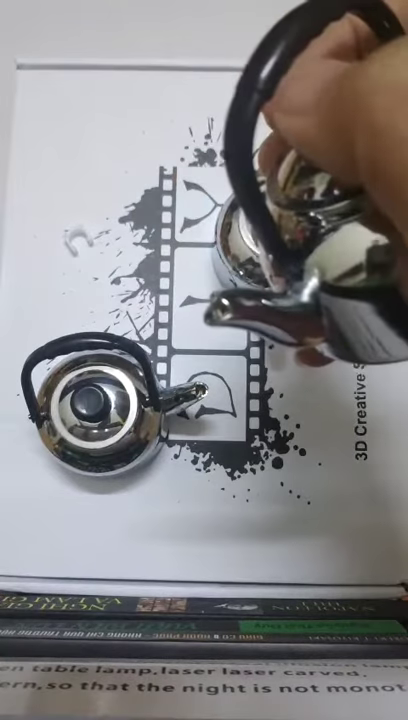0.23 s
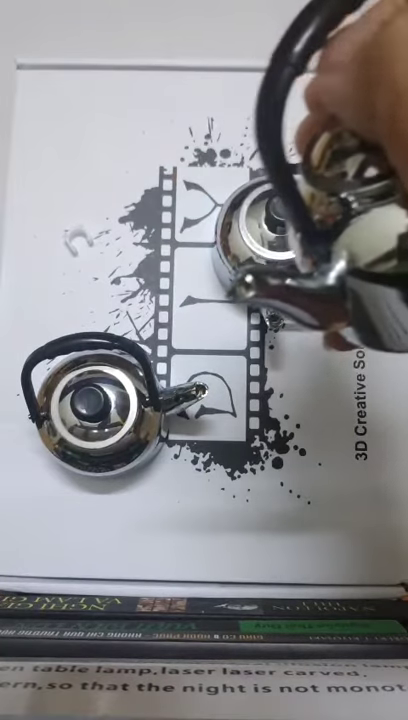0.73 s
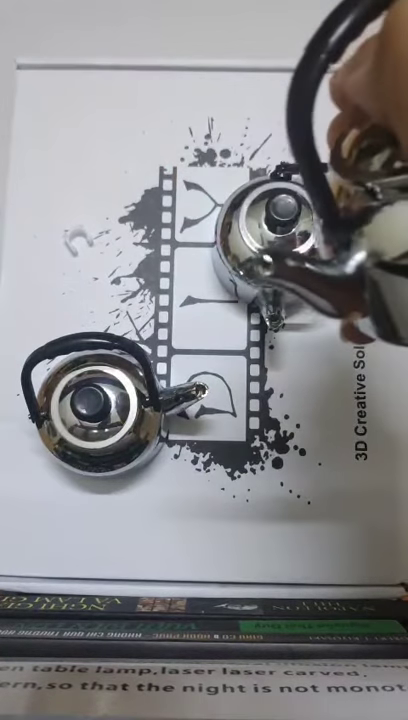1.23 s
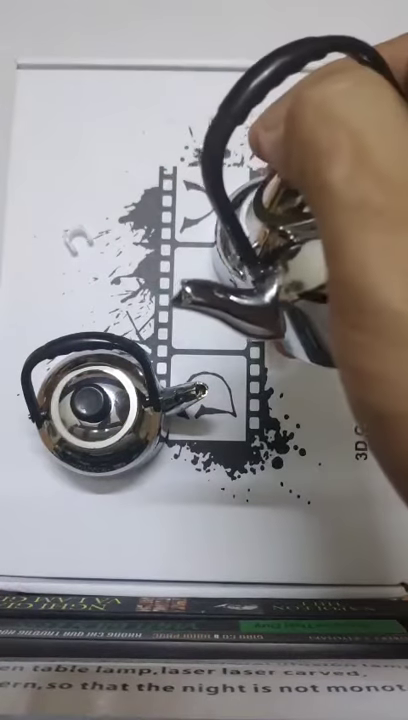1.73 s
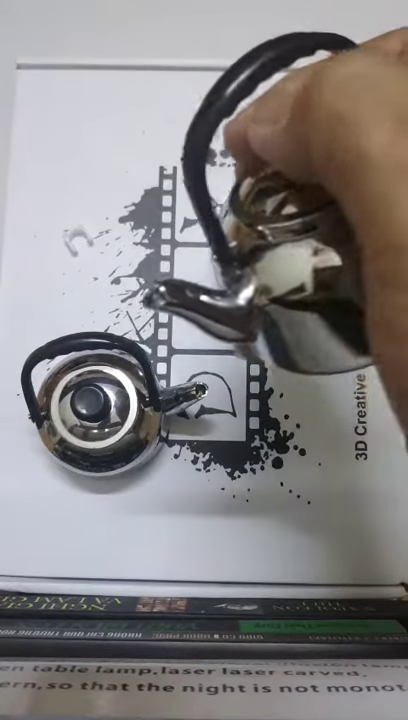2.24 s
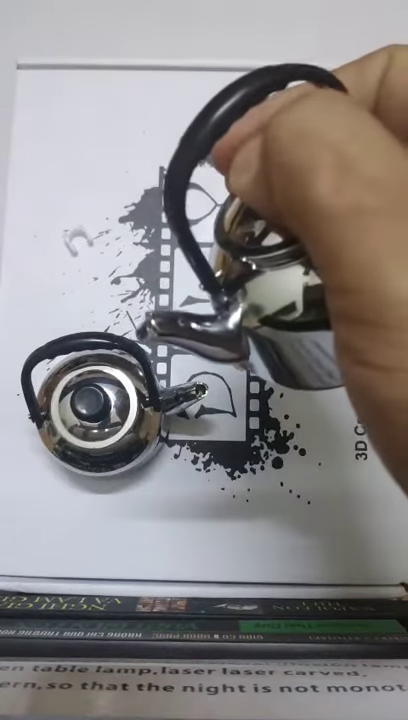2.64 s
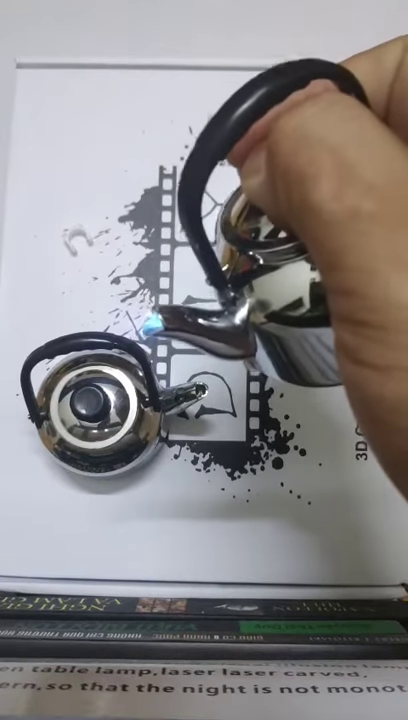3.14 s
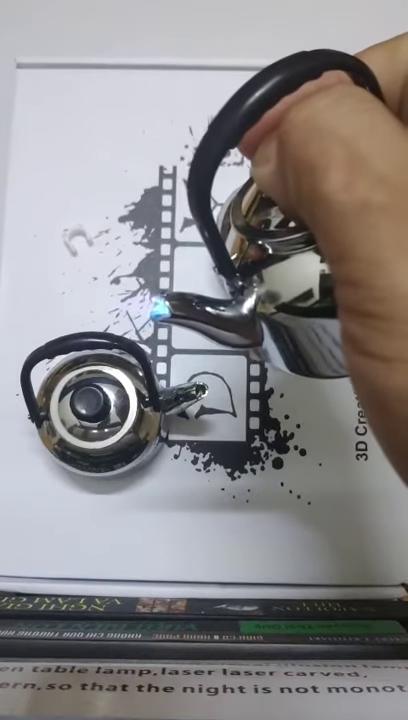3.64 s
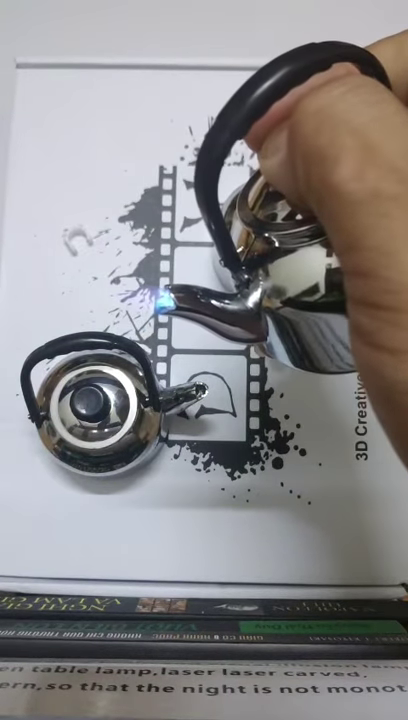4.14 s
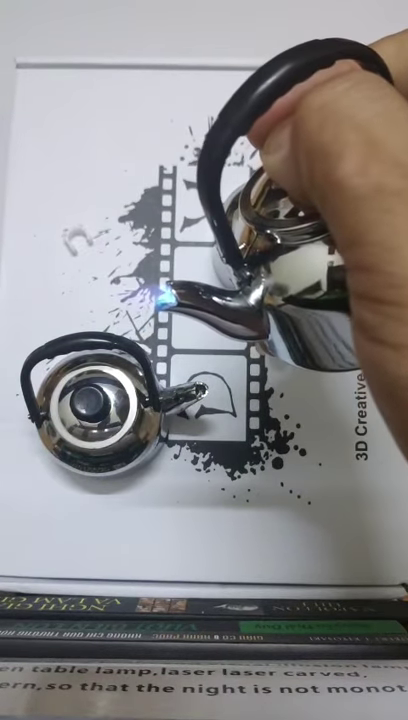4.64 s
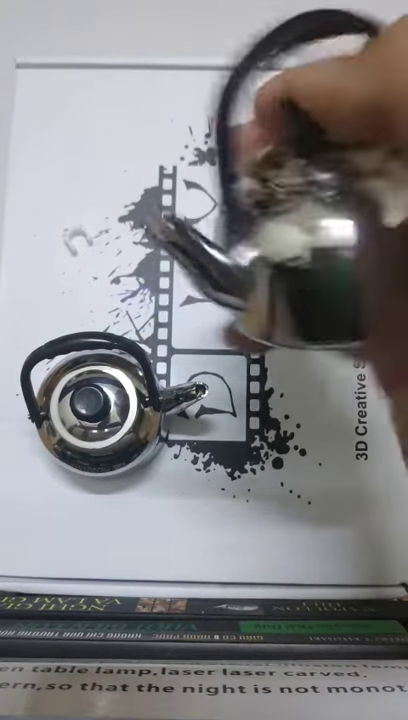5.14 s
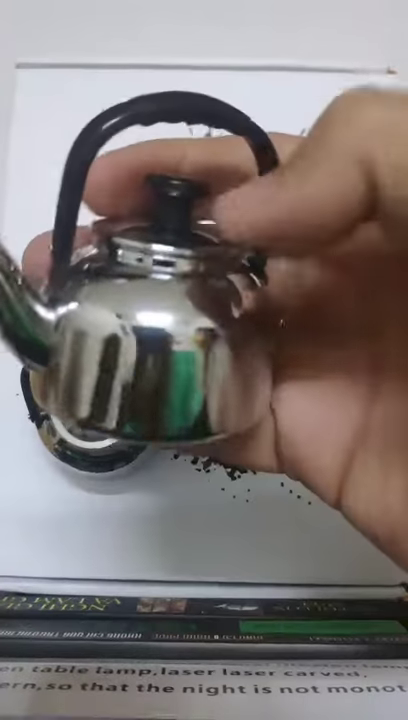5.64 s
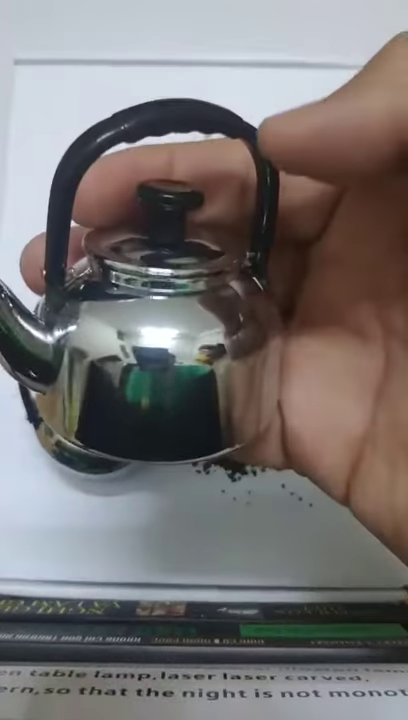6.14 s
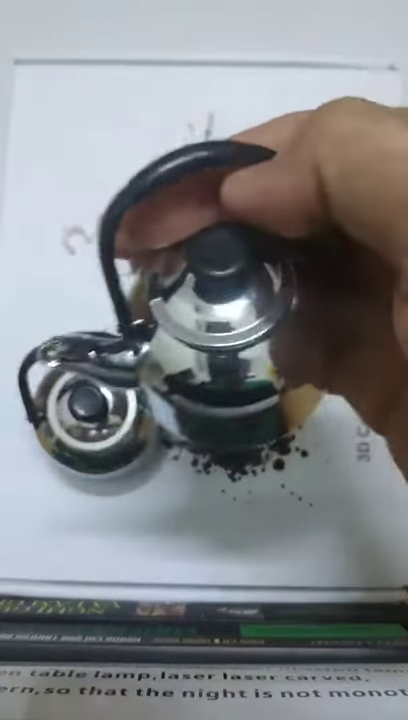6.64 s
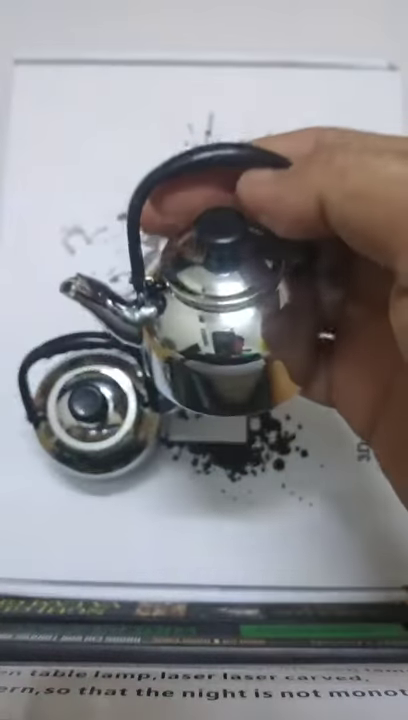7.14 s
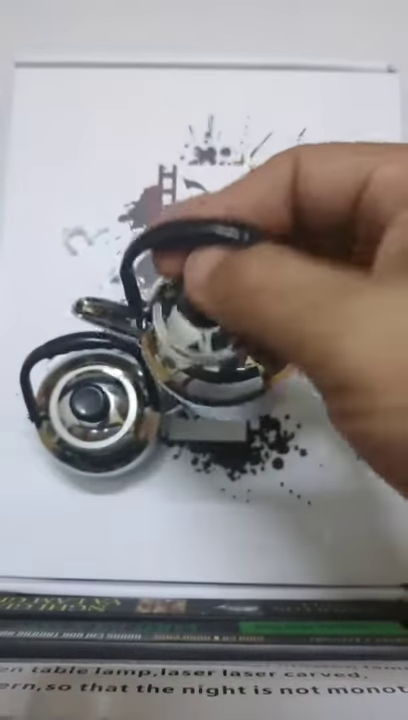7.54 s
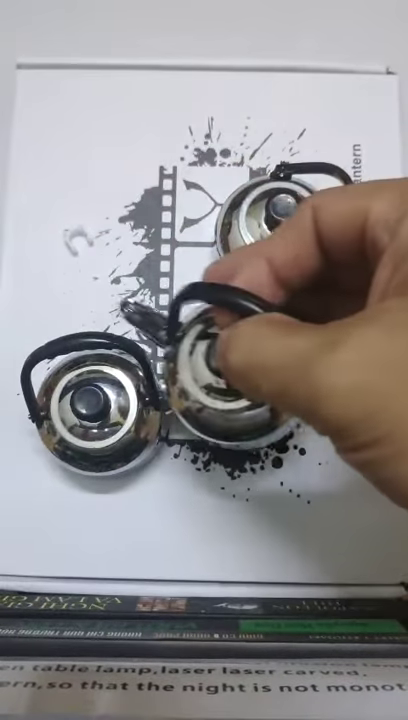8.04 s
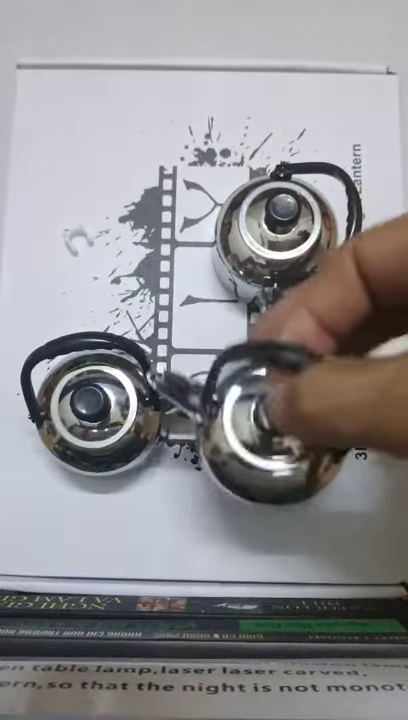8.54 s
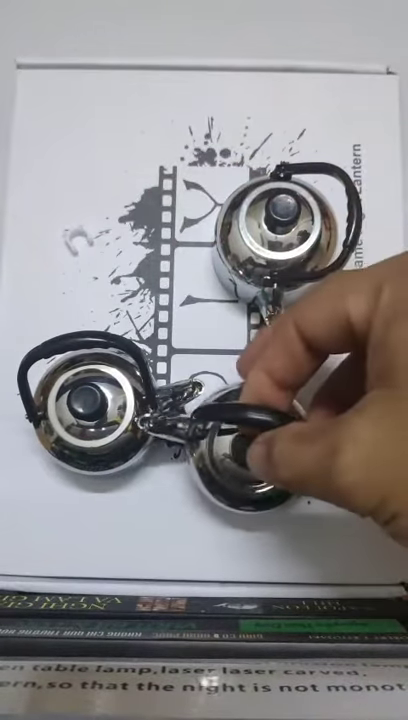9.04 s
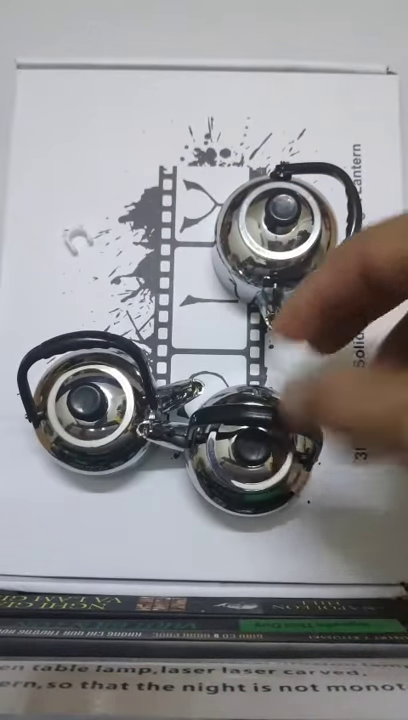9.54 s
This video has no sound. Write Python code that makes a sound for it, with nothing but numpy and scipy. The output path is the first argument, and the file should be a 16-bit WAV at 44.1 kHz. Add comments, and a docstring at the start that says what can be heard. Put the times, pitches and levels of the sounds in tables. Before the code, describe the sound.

In a room with a constantly rushing, faintly whining fan, a small teapot-shaped metal lighter leaks a thin hiss, then snaps sharply and flares into a steady fluttering jet. It burns about two seconds and clicks off. Later its foot clinks and knocks on the paper-covered table. The close stereo microphone catches lumpy low wind puffs, almost entirely on the left.

```python
"""Gas lighter beside a fan.

A small metal gas lighter is lit, let go and set down on a paper-covered table, close to a phone with two ports.
Noise shaped by the nozzle, spout and jet makes the gas hiss, flare up and burn; a hand's rub rustles low.
Dying sines and noise bursts make the igniter's snaps, the foot's clinks and the table's thuds.
Noise bands make a fan's rush, drone and whine; rumble and short swirls puff its draught at the left port."""
import sys
import numpy as np
from scipy.fft import rfft, irfft, next_fast_len
from scipy.io import wavfile
from scipy.ndimage import uniform_filter1d, minimum_filter1d, map_coordinates

SR = 44100
rng = np.random.default_rng(int(sys.argv[2]) if len(sys.argv) > 2 else 0)


def int16_out(signal):
    """Quantize to a 16-bit WAV file."""
    q = np.round(np.clip(np.atleast_2d(signal).T, -1, 1) * 32767)
    wavfile.write(sys.argv[1], SR, q.astype(np.int16))


N = 431738


def amp(db):
    """Amplitude factor from dB."""
    return 10 ** (np.asarray(db) / 20)


def unit(x):
    """Scale to rms 1."""
    return x / np.sqrt(np.mean(x ** 2) + 1e-20)


def along(points, hz):
    """Interpolate (Hz, value) points on a log frequency axis."""
    point_hz, value = np.transpose(points)
    return np.interp(np.log(hz + 1), np.log(point_hz + 1), value)


def curve(rows):
    """Gain per sample from (s, dB) rows."""
    return amp(np.interp(np.arange(N) / SR, *np.transpose(rows)))


def wobble(knots_per_s):
    """Smooth random curve through normal knots."""
    knots = rng.standard_normal(int(N * knots_per_s / SR) + 4)
    return map_coordinates(knots, [np.arange(N) * knots_per_s / SR])


def swell(start_s, rise_s, end_s, db, fall_db_per_s):
    """Gain per sample: a smooth rise, a hold until the end, then a steady fall in dB."""
    t = np.arange(N) / SR
    rise = np.sin(np.pi / 2 * np.clip((t - start_s) / rise_s, 0, 1)) ** 2
    return rise * amp(db - fall_db_per_s * np.maximum(t - end_s, 0))


def filtered(x, response):
    """Multiply the spectrum of x by a response of frequency."""
    size = next_fast_len(x.shape[-1] + 8192)
    spectrum = rfft(x, size) * response(np.fft.rfftfreq(size, 1 / SR))
    return irfft(spectrum, size)[..., :x.shape[-1]]


def rush(gain, alike, count=N):
    """Stereo noise, 3 dB over its gain at each port; the table sets the left-right correlation."""
    def mid_side(hz):
        turn = np.arccos(np.clip(along(alike, hz), -1, 1)) / 2
        return gain(hz) * [np.cos(turn), np.sin(turn)]
    mid, side = filtered(rng.standard_normal((2, count)), mid_side)
    return np.sqrt(2) * np.array([mid + side, mid - side])


def passing(start_s, gain, alike):
    """Rush of rms 1 that lasts three seconds."""
    out = np.zeros((2, N))
    add(out, start_s, unit(rush(gain, alike, count=3 * SR)))
    return out


def humps(rows, hz):
    """Gain of bell-shaped resonances (Hz, width Hz, dB rms) on white noise; powers add."""
    return np.sqrt(sum(amp(2 * db) * SR / (2 * width_hz) * np.exp(-np.pi * ((hz - centre_hz) / width_hz) ** 2)
                       for centre_hz, width_hz, db in rows))


def ring(modes, tilt_db, scatter_db, centre_hz):
    """One blow: modes share random strengths between ports, with a new phase at each."""
    t = np.arange(SR // 8) / SR
    scatter = rng.normal(0, scatter_db, len(modes))
    out = np.zeros((2, len(t)))
    for port in range(2):
        for (hz, db, t60_s), extra_db in zip(modes, scatter):
            level_db = db + extra_db + tilt_db * np.log2(hz / centre_hz)
            phase_turns = rng.uniform(0, 0.37)
            out[port] += amp(level_db - 60 * t / t60_s) * np.sin(2 * np.pi * (hz * t + phase_turns))
    return out * (1 - np.exp(-t / 0.00019))


def burst(lo_hz, hi_hz, t60_s):
    """Dying puff of band noise, partly shared by the ports."""
    t = np.arange(SR // 8) / SR
    noise = rng.standard_normal((2, len(t))) + rng.standard_normal(len(t))
    band = filtered(noise, lambda hz: 1 / (1 + (lo_hz / (hz + 1)) ** 6 + (hz / hi_hz) ** 6))
    return unit(band) * amp(-60 * t / t60_s) * (1 - np.exp(-t / 0.00018))


def add(track, s, sound):
    """Mix a sound in at a time in seconds."""
    track[..., round(s * SR):][..., :sound.shape[-1]] += sound


# Spectrum shape of the fan's rush. Each row: frequency in Hz, relative density in dB per Hz.
FAN_RUSH = [(25, -1.5), (100, -9), (200, -9.5), (310, -15), (420, -25.5), (950, -19), (1700, -19),
            (3500, -18), (4300, -19), (6500, -15), (8000, -7.5), (9300, -12.5), (10200, -21), (13000, -28),
            (16000, -32)]
# Broad fan resonances. Each row: centre in Hz, width in Hz, level in dB before rush() adds 3 dB.
FAN_DRONE = [(50.3, 7.5, -56.5), (122, 12, -63), (186.7, 25, -61), (581, 270, -65.5), (778, 119, -61),
             (1440, 220, -62.5), (1990, 320, -61.5), (2423, 265, -58.5), (2855, 390, -59.5),
             (4850, 370, -60.5), (5870, 850, -57.5), (7040, 270, -61), (8730, 270, -57.5)]
# Thin fan tones. Each row: centre in Hz, level in dB before rush() adds 3 dB.
FAN_WHINE = [(699.8, -65.5), (722, -67.5), (753.7, -63), (796.7, -73.5), (819.5, -64.5), (1130, -68.5),
             (1254, -64.5), (1480, -66), (1507, -63.5), (1890, -64.5), (2008, -67), (2223, -66),
             (2390, -65), (2514, -71.5), (2643, -63.5), (2891, -65), (3273, -76), (3332, -67),
             (3575, -71.5), (3898, -67), (4560, -73), (4802, -66), (4850, -62.5), (5432, -62), (5658, -62)]
# Likeness of the two ports. Each row: frequency in Hz, left-right correlation from -1 to 1.
PORT_LIKENESS = [(60, 0.93), (180, 1), (550, 0.65), (1650, 0.15), (4970, -0.042), (15000, 0.031)]
FAN_RUSH_DB = -43.5  # before rush() adds 3 dB


def fan():
    """Broad rush, boomy resonances and many thin, unsteady tones, the high ones more smeared."""
    tones = [(hz, 3 + 0.0035 * hz, db) for hz, db in FAN_WHINE]

    def gain(hz):
        broad = amp(FAN_RUSH_DB) * unit(amp(along(FAN_RUSH, hz)))
        return np.hypot(broad, humps(FAN_DRONE + tones, hz))
    return amp(0.48 * wobble(2.98)) * rush(gain, PORT_LIKENESS)


# Air moving over the left port. Each row: time in seconds, rumble level in dB.
DRAUGHT_LEVEL = [(0.0, -39), (0.35, -66), (1.0, -62), (2.2, -51), (2.6, -69), (3.3, -43), (3.55, -44),
                 (4.2, -48), (4.95, -46), (5.45, -62), (6.13, -45), (6.8, -61), (7.25, -45), (7.66, -50),
                 (8.0, -45), (9.2, -60), (9.6, -52), (9.79, -52)]
# Strong eddies on the left port. Each row: centre in seconds, swirl peak in dB, mid-swirl frequency in Hz.
EDDIES = [(0.39, -28, 59), (1.13, -18.5, 78), (1.163, -28, 47.7), (2.212, -28.5, 49), (2.395, -27, 37.6),
          (2.908, -31, 56), (2.956, -26, 35.8), (3.242, -26.5, 50.7), (3.394, -26, 55), (3.576, -28, 27),
          (3.695, -32, 42), (3.907, -28.5, 65), (3.961, -30, 48), (4.006, -34, 31), (4.448, -28.5, 48.3),
          (4.48, -29, 38), (4.537, -18.5, 84), (4.594, -32, 37), (4.738, -32, 39), (4.821, -21.5, 62.3),
          (4.96, -19, 41), (5.042, -32, 33), (5.307, -28, 33), (5.665, -29.5, 34.2), (5.694, -26, 43),
          (5.727, -22, 83), (6.208, -16.5, 39.6), (6.393, -28, 50), (6.465, -30, 103), (7.024, -29.5, 42),
          (7.17, -30.5, 61), (7.413, -28, 59), (7.481, -30, 43), (7.808, -28, 52), (7.85, -30.5, 42.8),
          (8.402, -27.5, 40.8), (8.476, -23.5, 42), (8.779, -22.5, 76), (8.814, -27.5, 37), (9.61, -35, 40)]
# Rumble around an eddy: level relative to its peak, exponential time constants before and after.
WAKE_DB, WAKE_LEAD_S, WAKE_TRAIL_S = -15.5, 0.035, 0.047


def draught():
    """Lumpy rumble swells around strong eddies, each a brief push and pull, nearly all at the left port."""
    rumble = filtered(rng.standard_normal(N), lambda hz: hz / (hz + 8) / (1 + (hz / 45) ** 2.0))
    knot_s = np.arange(0, N / SR, .005)
    wake = sum(amp(db + WAKE_DB) * np.exp(np.minimum((knot_s - s) / WAKE_LEAD_S, (s - knot_s) / WAKE_TRAIL_S))
               for s, db, hz in EDDIES)
    level = curve(DRAUGHT_LEVEL) + np.interp(np.arange(N) / SR, knot_s, wake)
    air = np.zeros(N + SR)
    air[:N] = level * unit(amp(1.8 * wobble(14)) * rumble)

    t = np.linspace(-.04, .04, round(.08 * SR))
    for (s, db, hz), (turn, fast) in zip(EDDIES, rng.uniform(0, 1, (len(EDDIES), 2))):
        glide = 900 * t * t * np.cos(9 * turn)
        swirl = np.exp(-(t * hz / 0.6) ** 2) * np.cos(2 * np.pi * (hz * t + glide + turn))
        # the smaller whirl riding on it, relatively louder on strong eddies
        whirl = np.exp(-(t / 0.007) ** 2) * np.cos(2 * np.pi * ((90 + 90 * fast) * t + 7 * turn))
        whirl_gain = amp(-8.5 + 0.35 * (db + 22))
        add(air, s + t[0], amp(db) * (swirl + whirl_gain * whirl))
    return air[:N] * amp([[0], [-36]])


# Nozzle resonances. Each row: centre in Hz, width in Hz, relative level in dB.
NOZZLE_BANDS = [(8350, 790, -1), (7260, 500, -9)]
# Spout resonances. Each row: centre in Hz, width in Hz, relative level in dB.
SPOUT_BANDS = [(1330, 430, -20.5), (2000, 900, -20), (2800, 680, -15.5), (3980, 500, -14), (4580, 660, -1),
               (5800, 900, -16), (6930, 870, -8), (8700, 1200, -3.5), (11400, 1600, -15.5),
               (14000, 4000, -17)]
# Jet flame spectrum. Each row: frequency in Hz, relative density in dB per Hz.
JET_FLAME = [(300, -30), (500, -1), (1500, -1), (4000, -6.5), (7000, 5), (9000, 4), (10300, -6), (11500, 1),
             (12500, -2), (14500, 2), (15800, -9)]
VALVE_OPEN_S, SPARK_S, VALVE_SHUT_S = 2.52, 3.103, 5.172
COLD_DB, COLD_RISE_S, COLD_FALL_DB_PER_S = -41.5, 0.036, 900  # unlit gas until the spark
LEAK_DB, LEAK_RISE_S, LEAK_FALL_DB_PER_S = -43, .005, 220  # the last gas as the valve shuts
FLARE_DB, FLARE_RISE_S, FLARE_HOLD_S, FLARE_FALL_DB_PER_S = -24.5, .003, 0.092, 193  # gathered gas burning off
FLAME_DB, FLAME_RISE_S, FLAME_LINGERS_S, FLAME_FALL_DB_PER_S = -45.5, .02, 0.028, 400


def gas():
    """Cold gas hisses in the nozzle, flares up in the spout at the spark, then burns as a fluttering jet."""
    flow = swell(VALVE_OPEN_S, COLD_RISE_S, SPARK_S, COLD_DB, COLD_FALL_DB_PER_S)
    flow += swell(VALVE_SHUT_S, LEAK_RISE_S, VALVE_SHUT_S, LEAK_DB, LEAK_FALL_DB_PER_S)
    nozzle = passing(VALVE_OPEN_S, lambda hz: humps(NOZZLE_BANDS, hz), [(1000, 0.16)])
    cold = flow * amp(wobble(24.9)) * nozzle

    burn = swell(SPARK_S, FLARE_RISE_S, SPARK_S + FLARE_HOLD_S, FLARE_DB, FLARE_FALL_DB_PER_S)
    spout = passing(SPARK_S, lambda hz: humps(SPOUT_BANDS, hz), [(1000, 0.08)])
    flare = burn * amp(1.6 * wobble(120)) * spout

    flame = swell(SPARK_S, FLAME_RISE_S, VALVE_SHUT_S + FLAME_LINGERS_S, FLAME_DB, FLAME_FALL_DB_PER_S)
    jet = passing(SPARK_S, lambda hz: amp(along(JET_FLAME, hz)), [(1000, .2)])
    lit = flame * amp(0.72 * wobble(23)) * jet
    return cold + flare + lit


# Igniter button snaps. Each row: start in seconds, blow level in dB, brightness in dB per octave,
# low body in dB before a 14 dB cut.
IGNITER_SNAPS = [(3.0995, -30, 8, -10), (3.1022, 0, -2, -25), (3.1030, 1.5, 2, -30), (3.107, -13, 8, -14),
                 (3.1098, -14, -1, -17), (5.173, -19, 9, 10), (5.175, -26, 7, 3)]
# Modes of the lighter's shell. Each row: frequency in Hz, relative level in dB, t60 in seconds.
SHELL_MODES = [(1610, -18, 0.0077), (2140, -13, 0.0027), (3180, -29, 0.0052), (4030, -16, 0.0057),
               (4630, -3, 0.008), (4840, -5, 0.0053), (7040, -9.5, 0.0061), (8170, -7.5, 0.0057),
               (9060, -4, 0.0063), (11900, -16, 0.005), (15000, -26, 0.004)]


def igniter():
    """The spring hammer cracks on the crystal, rattles and rings the shell; the button snaps back on release."""
    out = np.zeros((2, N))
    for s, db, tilt_db, body_db in IGNITER_SNAPS:
        shell = ring(SHELL_MODES, tilt_db, scatter_db=4.5, centre_hz=4400)
        crack = amp(-13) * burst(3500, 10000, .005)
        body = amp(body_db - 14) * burst(650, 1330, 0.0073)
        add(out, s, amp(db) * (shell + crack + body))
    return filtered(out, lambda hz: 1 / (1 + (700 / (hz + 1)) ** 6))


# Palm rustle bands. Each row: centre in Hz, width in Hz, relative level in dB.
PALM_BANDS = [(321, 45, 0), (487, 80, 1), (610, 80, -10)]
RUB_S, RUB_DB, RUB_RISE_S, RUB_HOLD_S, RUB_FALL_DB_PER_S = 4.86, -53, .13, 0.075, 70


def grip():
    """A hand shifts its grip: a soft low rustle of skin on the shell."""
    press = swell(RUB_S, RUB_RISE_S, RUB_S + RUB_RISE_S + RUB_HOLD_S, RUB_DB, RUB_FALL_DB_PER_S)
    skin = passing(RUB_S, lambda hz: humps(PALM_BANDS, hz), PORT_LIKENESS)
    return press * amp(2.4 * wobble(30)) * skin


# Touches of the metal foot on the table. Each row: start in seconds, clink in dB (mean of the ports),
# knock in dB, hardness as thud tilt in dB per octave.
TABLE_TOUCHES = [(7.973, -21, -34.5, -1), (7.9783, -26, -41, 0), (7.9823, -31, -39, 1),
                 (7.9845, -29, -35.5, 1), (8.8842, -33.5, -43, 2.5), (8.8924, -41, -44, 4.5),
                 (9.079, -47, -40, 2), (9.1631, -48, -34, 3), (9.3505, -46, -35, 0.5)]
# Modes of the metal foot. Each row: frequency in Hz, relative level in dB, t60 in seconds.
FOOT_MODES = [(4770, -13, .012), (5800, -8, 0.011), (6000, 1, 0.013), (6370, -3, 0.014), (7650, -4, 0.014),
              (8400, -7, .012), (9600, -16, 0.0092), (12500, -16, .008)]
# Modes of the table top. Each row: frequency in Hz, relative level in dB, t60 in seconds.
TABLE_MODES = [(225, 2, 0.049), (296, -4, 0.068), (448, -9, 0.12), (655, -1.5, 0.029), (870, -12, 0.023),
               (1090, -6, 0.018), (1470, -10, 0.014), (2300, -14, 0.0095)]


def set_down():
    """Each touch clinks the metal foot and thuds on the table top; a harder touch is brighter."""
    out = np.zeros((2, N))
    for s, clink_db, knock_db, hard_db in TABLE_TOUCHES:
        clink = ring(FOOT_MODES, 0, scatter_db=2, centre_hz=6000)
        clink += amp(-3 + 3.9 * hard_db) * burst(3200, 11600, .006)
        thud = ring(TABLE_MODES, hard_db, scatter_db=4, centre_hz=500)
        thud += amp(-3.5 + 2 * hard_db) * burst(200, 1300 * amp(1.9 * hard_db), 0.02)
        add(out, s, amp(clink_db) * clink * amp([[-2], [2]]) + amp(knock_db) * thud)
    return out


def scene():
    """Sum of all sources, left and right."""
    return fan() + draught() + gas() + igniter() + grip() + set_down()


# Difference in port colour. Each row: frequency in Hz, left minus right in dB.
PORT_COLOUR = [(300, 0.5), (2400, 0), (4400, -1), (7400, -5.5), (8900, 3.5), (10000, 10), (11500, 2),
               (16000, 6)]
TOP_HZ = 15830


def record(dry):
    """Port colours, a limiter that ducks on loud peaks, holds and recovers steadily, clipping, band limit."""
    x = filtered(dry, lambda hz: amp(along(PORT_COLOUR, hz) * [[.5], [-.5]]))
    peak_db = 20 * np.log10(np.abs(x).max(axis=0) + 1e-9)
    over_db = np.maximum(peak_db + 0.46, 0)
    held_db = -minimum_filter1d(-over_db, size=2401, origin=1190)  # hardly any look-ahead, 54 ms of hold
    ramp_db = 130 * np.arange(N) / SR  # recovery at 130 dB/s
    duck_db = np.maximum.accumulate(held_db + ramp_db) - ramp_db
    x = np.clip(x * amp(-uniform_filter1d(duck_db, size=40)), -1, 1)
    return np.clip(filtered(x, lambda hz: hz < TOP_HZ), -1, 1)


dry = scene()
out = record(dry)
int16_out(out)
```